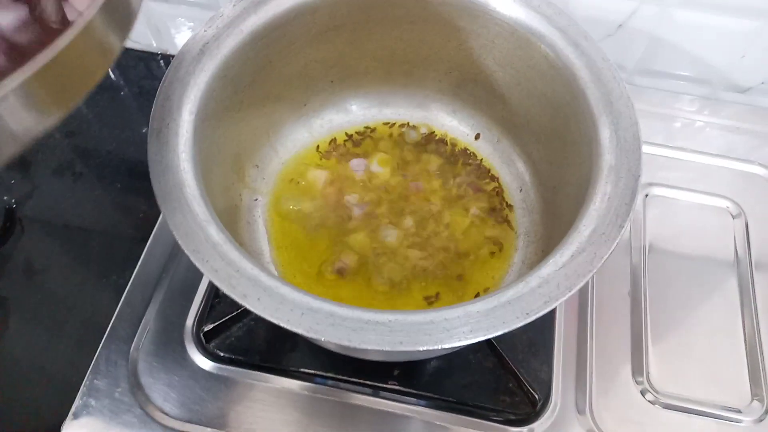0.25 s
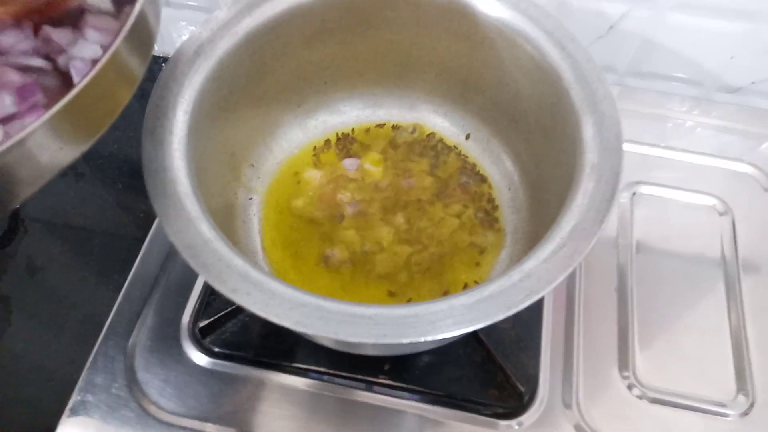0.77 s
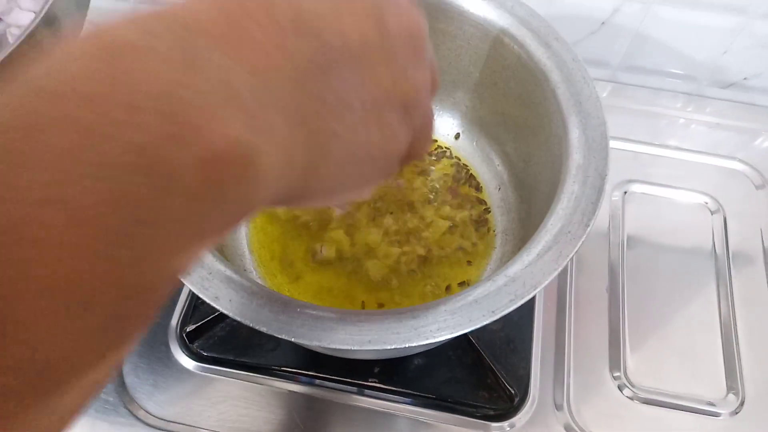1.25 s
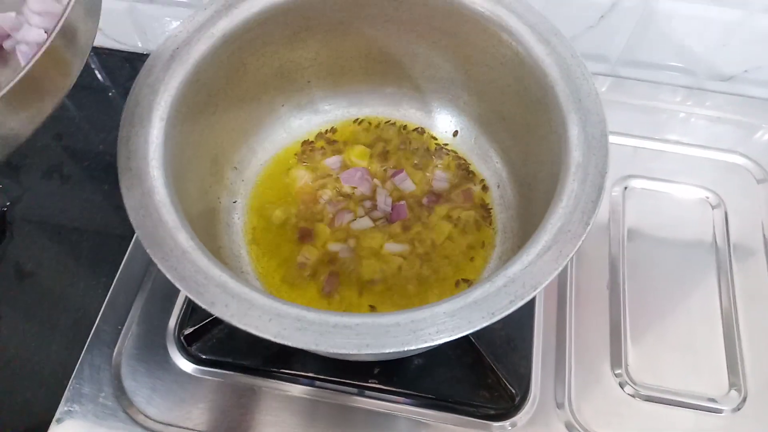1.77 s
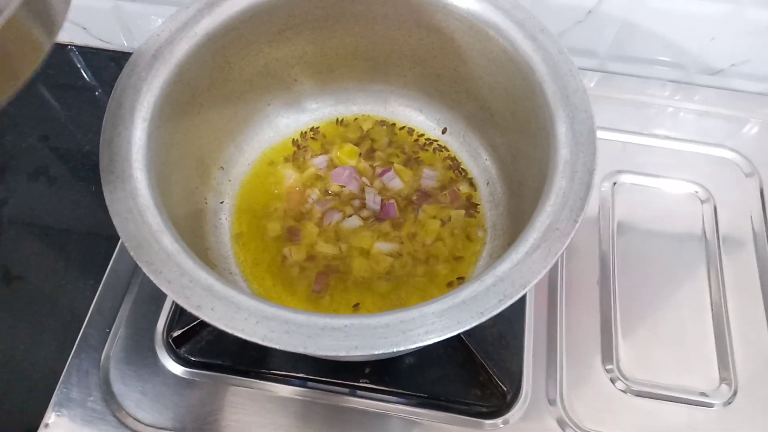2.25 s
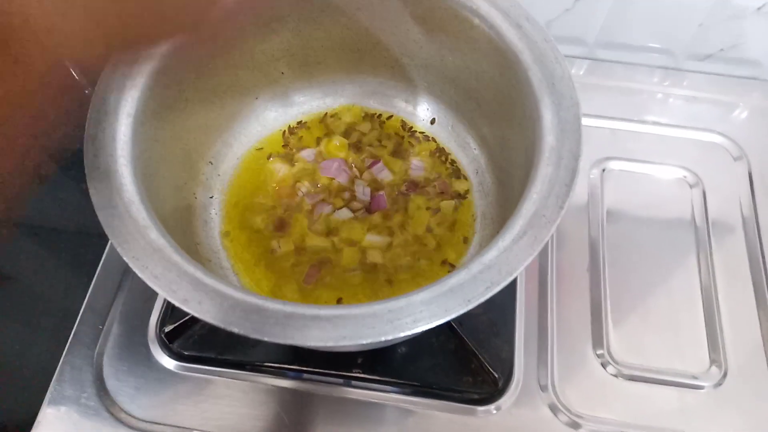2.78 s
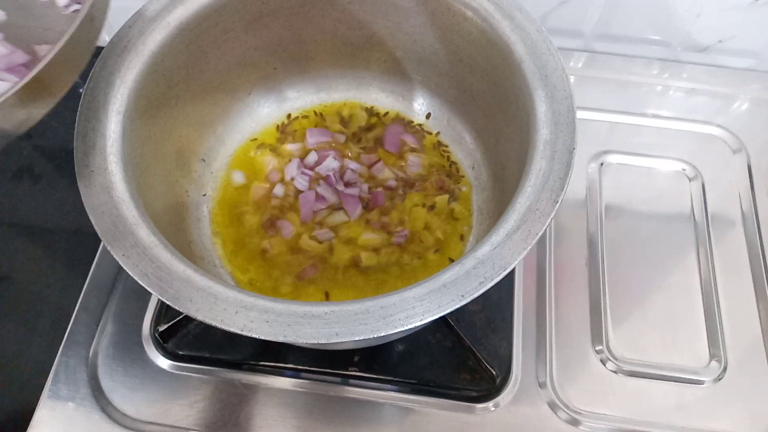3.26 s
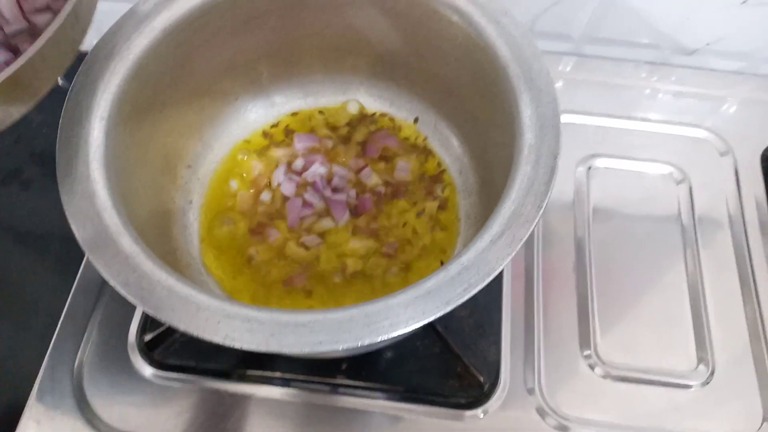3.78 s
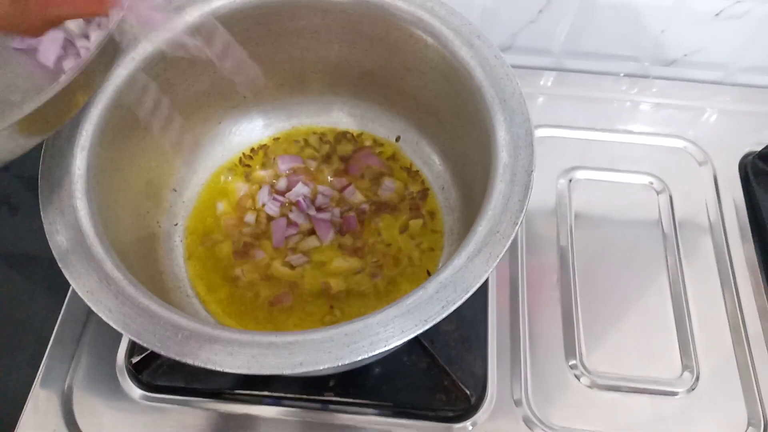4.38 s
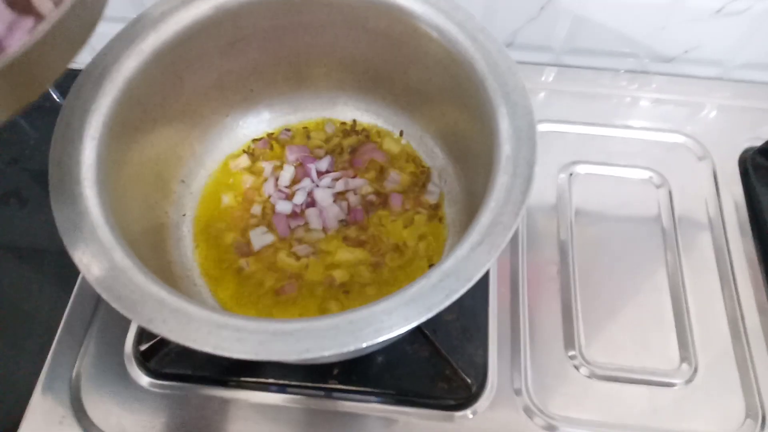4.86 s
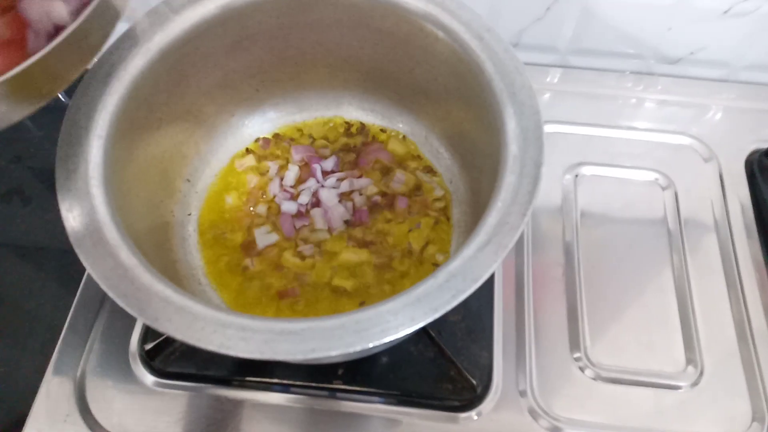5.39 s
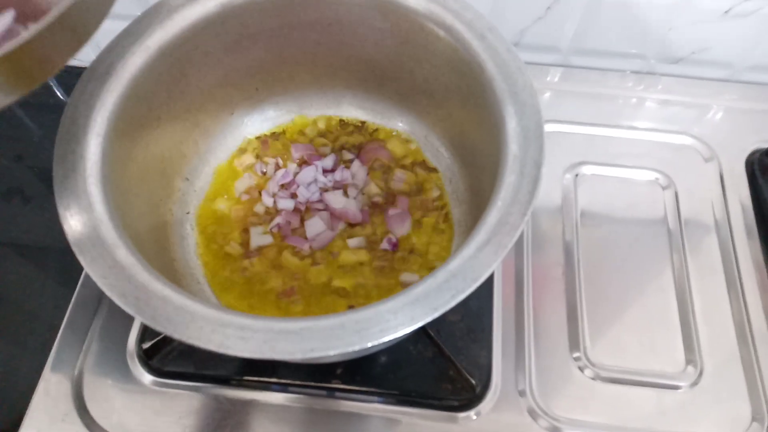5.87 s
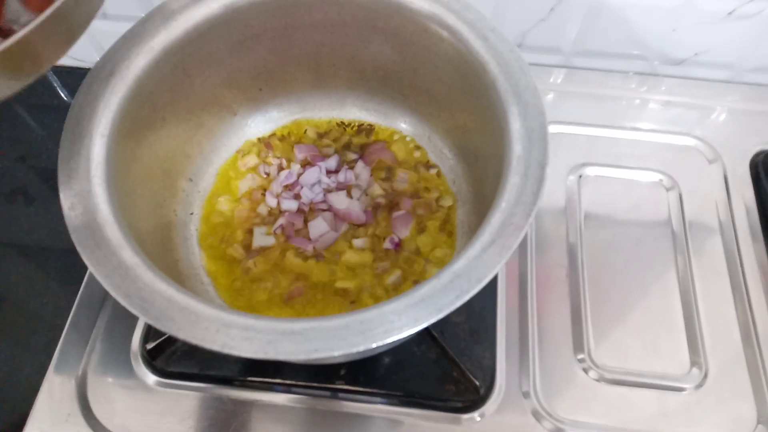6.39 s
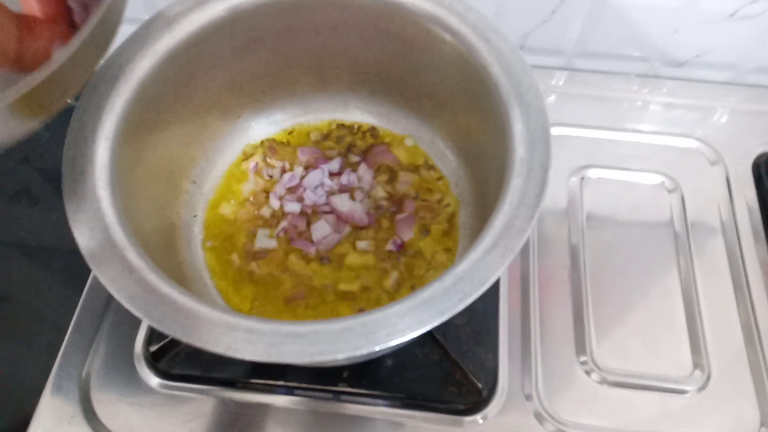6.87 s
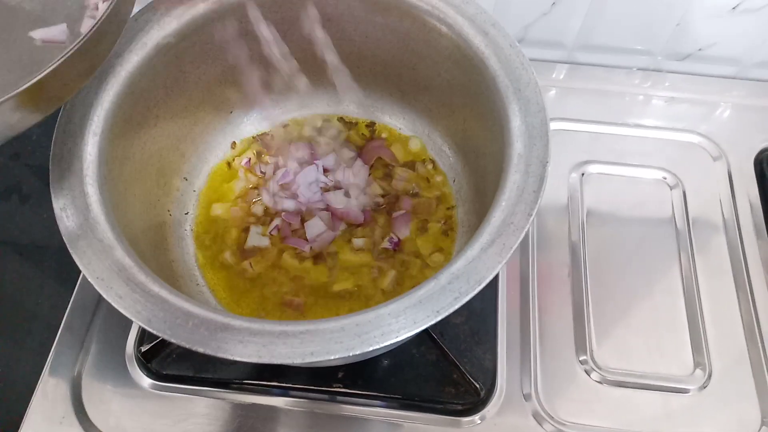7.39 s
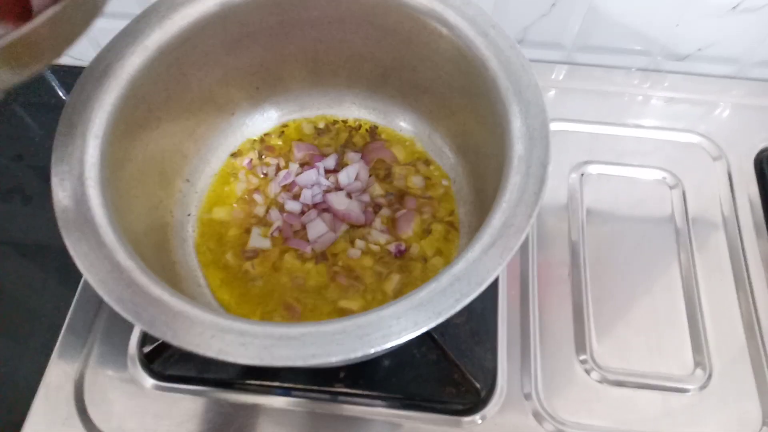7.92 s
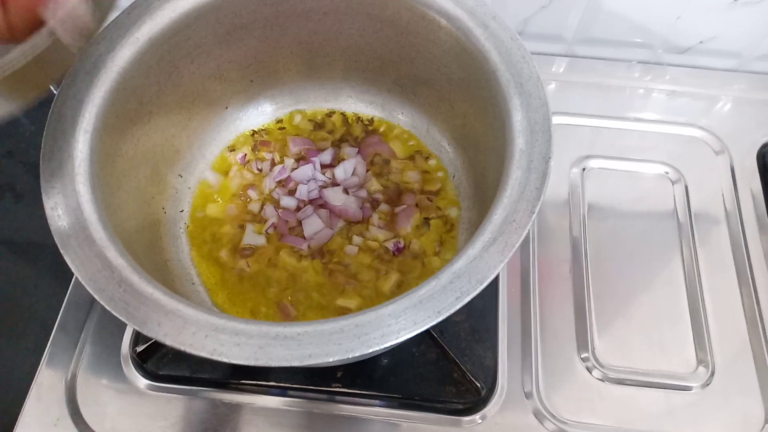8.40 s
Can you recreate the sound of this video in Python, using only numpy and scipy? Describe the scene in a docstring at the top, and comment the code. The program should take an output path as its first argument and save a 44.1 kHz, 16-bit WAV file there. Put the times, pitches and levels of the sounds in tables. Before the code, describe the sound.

A hand-held microphone close over a pot catches vigorous frying: gurgling bubbles, mid-bright crackle and fine fizz, coloured by hollow metal resonance. It is loudest at the start, with rapid hard pops, and soon becomes thinner and steadier. Short bubbling surges and hissing flares follow as onion lands, with occasional plops and tiny spits. A quiet low rumble and hum lie beneath, with a short kitchen echo.

```python
"""Onion frying in a deep pot

Chopped onion fries in hot oil in a deep aluminium pot on a gas stove, close to a hand-held microphone.
Water boils out as thousands of tiny ringing steam bubbles that burst, fiercely at first, then steadily.
Single bubbles pop loudly, oil spits, big bubbles and onion pieces plop, and a low rumble and hum lie below.
Resonances colour the bubbles, pops and plops like the pot; echoes add its walls and the kitchen."""
import sys
import numpy as np
from scipy import signal
from scipy.fft import rfft, irfft
from scipy.io import wavfile
from scipy.ndimage import uniform_filter1d

SR = 44100
rng = np.random.default_rng(int(sys.argv[2]) if len(sys.argv) > 2 else 0)


def file_out(sig):
    """Save sig as 16-bit WAV at sys.argv[1]."""
    # one column per channel
    cols = np.atleast_2d(sig).T
    # limit, then scale
    lim = np.clip(cols, -1, 1)
    pcm = np.round(lim * 32767).astype(np.int16)
    wavfile.write(sys.argv[1], SR, pcm)


N = 381465
TIME = np.arange(N) / SR  # seconds

# Event levels below are peaks before the gain of their layer and of the kitchen.
# standout steam pops: t/s, level/dB, f/Hz, ring/cycles (shortened in pops)
STEAM_POPS = [(0.0412, -6.5, 3300, 5.5), (0.1455, -6.5, 3800, 2.9), (0.2039, -5.5, 3410, 2),
              (0.2481, -5.5, 2300, 1.2), (0.341, -9, 3730, 2.1), (0.399, -6.5, 3930, 4.3),
              (0.509, -7, 2650, 1.5), (0.6384, -4, 3630, 4.3), (0.6867, -5.5, 3000, 1.5),
              (0.7118, -5, 2940, 1.8), (0.8948, -4, 3200, 2.3), (0.9186, -10.5, 3150, 3.8),
              (1.0787, -9.5, 3560, 3.9), (1.1731, -3.5, 3330, 1.9), (1.2856, -5, 3650, 1.9),
              (1.5993, -6.5, 3480, 3.7), (1.6639, -7, 3700, 5.4), (2.2926, -7.5, 3800, 2.2),
              (2.378, -8.5, 3410, 9.8), (2.678, -11, 3870, 4.6), (3.3365, -11.5, 4030, 3.1),
              (3.9552, -7, 3460, 1.7), (4.0022, -3.5, 3540, 0.98), (4.1889, -4, 3270, 2.3),
              (4.509, -9, 2500, 3.7), (4.5456, -11, 3500, 5.3), (4.966, -11, 3180, 4.5),
              (5.5471, -5.5, 3300, 4.6), (5.782, -11.5, 3720, 5.7), (5.8846, -9.5, 3700, 4.5),
              (5.8923, -11.5, 3580, 5), (5.9342, -17, 2400, 4.4), (6.0598, -9.5, 3700, 3.5),
              (6.1287, -12, 2360, 7.3), (6.209, -2.5, 4230, 5.7), (6.3002, -5.5, 3430, 1.8),
              (6.5716, -7.5, 3700, 1.4), (7.4578, -11.5, 3800, 4.1), (7.61, -3.5, 3930, 2.1),
              (7.6443, -7, 3740, 8.8), (7.95, -10, 2940, 11), (8.2591, -12.5, 3300, 4.4),
              (8.3504, -8.5, 3440, 4.6), (8.5857, -8.5, 2780, 1.5)]
# the sharpest spits of oil: t/s, level/dB, f/Hz
OIL_SPITS = [(0.056, -22, 6470), (0.572, -25, 6560), (0.7527, -24.5, 7500), (1.2868, -21.5, 6760),
             (3.878, -22.5, 5900), (4.396, -30, 8240), (4.9419, -38, 12700), (6.208, -29, 7960),
             (6.301, -30, 6640), (6.3483, -26, 6160), (6.5705, -38, 7500), (6.6515, -28, 6140),
             (6.7992, -23.5, 6760), (7.6106, -26.5, 5870), (8.403, -32, 7630), (8.421, -27, 4980),
             (8.4529, -36, 9800)]
# dull plops of big bubbles and of onion pieces landing: t/s, level/dB, f/Hz, ring/cycles
DULL_PLOPS = [(0.8932, -9.5, 1010, 0.48), (0.918, -18.5, 700, 0.5), (1.0933, -12, 1420, 1.05),
              (1.4669, -9, 1650, 0.55), (2.6511, -20, 710, .4), (3.4975, -12.5, 794, 0.25),
              (3.555, -22, 950, 0.97), (3.6743, -25.5, 980, 1.6), (4.0011, -18, 810, 0.36),
              (4.6023, -6, 1060, 0.28), (6.0282, -15.5, 700, 0.28), (6.904, -12, 1140, 0.45),
              (7.8555, -16.5, 1110, 0.63), (7.9181, -11.5, 1300, 0.48), (8.2353, -7.5, 1600, 0.76),
              (8.2395, -14.5, 800, 0.26)]
# soft low bumps: t/s, level/dB, f/Hz, ring/cycles
SOFT_BUMPS = [(1.286, -38, 186, 1.1), (3.24, -46.5, 238, 20), (3.455, -30, 320, 2.5),
              (5.198, -44, 110, 5.8), (6.208, -46, 170, 0.44), (6.301, -35, 170, 0.29),
              (6.611, -38.5, 75, 1.4), (6.798, -43, 180, 0.8)]

# resonances of the pot and the air in it: f/Hz, width/Hz, boost/dB
POT_MODES = [(367.5, 9.3, 13), (630, 19, 1), (674, 8.9, 5), (732.4, 14, 6.8), (904, 28, 4), (1001, 6.9, 6),
             (1128, 16, 5.5), (1434, 6.7, 4.5), (1516, 26, 3.5), (1607, 44, 10), (1720, 61, 3.5),
             (2463, 86, 8), (3160, 160, 3)]
# broad colour of the frying as it leaves the pot: f/Hz, level/dB
FRYING_COLOUR = [(150, -29.5), (350, -15.5), (500, -18.5), (720, -13), (1130, -15), (1450, -9.5),
                 (2100, -5.5), (3200, 0.5), (4150, 1.5), (4900, -5), (5550, -15), (6600, -16),
                 (10500, -37.5), (15500, -38)]
# broad shape of the flame's rumble, relative only: f/Hz, level/dB per Hz
FLAME_SHAPE = [(20, -27), (42, -21), (58, -4), (80, -4.5), (130, -3.5), (200, -6), (400, -7.5),
               (900, -13.5), (4000, -39)]
# rumble around the stove, before the gain in stove: t/s, level/dB
RUMBLE_LEVEL = [(0, -58.5), (1.25, -60), (1.6, -61), (2.7, -61), (3.4, -58), (4.2, -59.5), (4.9, -58),
                (5.9, -58), (7.55, -58), (8.1, -60.5), (8.65, -57.5)]
# low hum and resonances around the stove: f/Hz, width/Hz, boost/dB
HUM_AND_RESONANCES = [(60.2, 3.9, 9), (84, 3.4, 3.5), (110, 6.9, 9), (183.8, 3.8, 11), (216, 5.2, 6.5)]

# One row for each bubble size, before the trims in sizzle:
# settled level/dB, extra at the start/dB, share of a surge, share of a handful's flare
LARGE_BUBBLES = (-37, 9.0, 1.0, 0.03)
MIDDLE_BUBBLES = (-31, 11, 0.35, 0.1)
FINE_BUBBLES = (-48.5, 10.5, 0.25, 0.5)
SPRAY_DROPLETS = (-64.5, 8, -0.06, 0.68)
# handfuls of wet onion land and the fine spray flares up: t/s, full flare/dB
ONION_HANDFULS = [(1.36, 4), (2.96, 5.5), (4.5, 6), (5.6, 1.9), (8.22, 4)]
# surges of coarse bubbling: t at the top/s, time from the top to 37 % of the dB/s, full surge/dB
BUBBLING_SURGES = [(0.22, 0.038, 4), (1.48, 0.087, 2), (2.08, 0.074, 2.0), (3.959, 0.13, 3.5),
                   (4.53, 0.1, 4), (4.97, 0.07, 2.5), (6.18, 0.24, 3), (6.98, 0.11, 3.5), (7.88, 0.26, 3.4),
                   (8.27, 0.09, 3.5), (8.62, 0.072, 3.5)]
# lesser pops at random: rate/per s, level over the crackle/dB, spread/dB, f/Hz, spread/octaves
RANDOM_POPS = (7.0, 14.1, 0.99, 3420, 0.19)
# lesser spits at random: rate/per s, level over the fizz/dB, spread/dB, f/Hz, spread/octaves
RANDOM_SPITS = (4.0, 12, 2.2, 6760, 0.224)

SETTLE_S = 1.15  # time constant of the first fierce boil dying down
FLARE_RISE_S, FLARE_HOLD_S, FLARE_FADE_S = 0.1, 0.35, 0.3
SPRAY_DRIFT_DB = 0.8  # the spray comes in uneven puffs
RANDOM_POP_CYCLES = 3.5  # ring, shortened in pops
EDGE_HZ = 15750  # upper band limit


def sizzle(pot):
    """Large bubbles gurgle, middling ones crackle, the finest fizz, droplets prickle, in shared flurries."""
    large_db = boiling(*LARGE_BUBBLES) + 0.47
    middle_db = boiling(*MIDDLE_BUBBLES) - 0.3
    fine_db = boiling(*FINE_BUBBLES) - 0.8
    spray_db = boiling(*SPRAY_DROPLETS) + 2
    flurry = wobble(size=500)
    spray_db = spray_db + SPRAY_DRIFT_DB * wobble(size=5000)
    fizz_colour = high_pass(pot, hz=5360, order=6)
    prickle_colour = high_pass(pot, hz=9500, order=4)
    gurgle = swarm(pot, large_db, 1.3 * flurry, low_hz=595, high_hz=1876,
                   per_s=1500, spread_db=3.0, cycles=1.03)
    crackle = swarm(pot, middle_db, 0.84 * flurry, low_hz=2460, high_hz=4460,
                    per_s=1700, spread_db=3.5, cycles=1.25, count=80)
    fizz = swarm(fizz_colour, fine_db, 1.2 * flurry, low_hz=5720, high_hz=10300,
                 per_s=2400, spread_db=4.5, cycles=2.3)
    prickle = swarm(prickle_colour, spray_db, 0.5 * flurry, low_hz=10500, high_hz=16500,
                    per_s=1000, spread_db=4.5, cycles=2.5, count=24)
    return gurgle + crackle + fizz + prickle


def swarm(colour, level_db, flurry_db, low_hz, high_hz, per_s, spread_db, cycles, count=48):
    """Bubbles of many sizes burst at random, most of them weak."""
    # harder boiling means more bubbles
    chance = per_s / SR * amp(level_db - np.median(level_db))
    luck = np.minimum(rng.exponential(1, N), np.log(120))
    strength = amp(spread_db * luck + flurry_db)
    bursts = strength * rng.choice([-1, 1], N) * (rng.random(N) < chance)
    kind = rng.integers(0, count, N)
    out = np.zeros(N)
    for k, hz in enumerate(np.geomspace(low_hz, high_hz, count)):
        grain = walls(bubble(hz, cycles * rng.uniform(0.27, 1.21), rise_cycles=0.39))
        grain = grain / np.linalg.norm(grain) * np.sqrt(hz)
        out += signal.oaconvolve(bursts * (kind == k), grain)[:N]
    out = signal.oaconvolve(out, colour)[:N]
    # even out the slow level, then follow the wanted one
    power = uniform_filter1d(out ** 2, size=13000)
    return amp(level_db) * out / np.sqrt(abs(power) + 1e-20)


def boiling(settled_db, start_db, surge_share, flare_share):
    """Level of one bubble size: it settles, and takes its share of each surge and handful's flare."""
    surge_db = sum(db * np.exp(-((TIME - s) / width) ** 2) for s, width, db in BUBBLING_SURGES)
    flare_db = np.zeros(N)
    for s, db in ONION_HANDFULS:
        rise = np.clip((TIME - s) / FLARE_RISE_S, 0, 1)
        fading_s = np.maximum(TIME - s - FLARE_RISE_S - FLARE_HOLD_S, 0)
        flare_db += db * rise * np.exp(-fading_s / FLARE_FADE_S)
    early_db = start_db * np.exp(-TIME / SETTLE_S)
    return settled_db + early_db + surge_share * surge_db + flare_share * flare_db


def bubble(hz, cycles, rise_cycles, size=1024):
    """A bursting bubble rings for a few cycles."""
    turns = np.arange(size) * hz / SR
    return np.sin(2 * np.pi * turns) * (1 - np.exp(-turns / rise_cycles)) * np.exp(-turns / cycles)


def pops(pot):
    """Big steam bubbles burst with a crack and ring briefly between the pot's walls."""
    out = np.zeros(N)
    lesser = [(*row, RANDOM_POP_CYCLES) for row in strays(boiling(*MIDDLE_BUBBLES), *RANDOM_POPS)]
    for s, db, hz, cycles in STEAM_POPS + lesser:
        burst = bubble(hz, cycles * 0.6, rise_cycles=0.28)
        burst[0] += 1.4 / max(cycles, 1)  # the shorter the ring, the harder the crack
        burst = echoes(burst, echo_db=-4.0, t60=0.07, delay=0.0006)
        add(out, s, amp(db) * peaked(signal.fftconvolve(burst, pot)))
    return amp(1.23) * out


def spits():
    """Droplets of oil snap: a bright click and a very short ring."""
    out = np.zeros(N)
    for s, db, hz in OIL_SPITS + strays(boiling(*FINE_BUBBLES), *RANDOM_SPITS):
        tick = bubble(hz, cycles=1.44, rise_cycles=0.15)
        tick[0] += 0.45  # the click
        tick = high_pass(tick, hz=0.46 * hz, order=3)
        add(out, s, amp(db) * peaked(walls(tick)))
    return amp(8.5) * out


def strays(level_db, per_s, over_db, spread_db, hz, octaves, count=120):
    """Rows (t/s, level/dB, f/Hz) of chance bursts that stand out of a layer."""
    times = (np.arange(count) + rng.uniform(-1, 1, count)) / per_s
    loud, high = rng.standard_normal((count, 2)).T
    peaks_db = np.interp(times, TIME, level_db) + over_db + spread_db * np.clip(loud, -2, 2)
    pitches_hz = hz * 2 ** (octaves * high)
    return [row for row in zip(times, peaks_db, pitches_hz) if 0 < row[0] < TIME[-1]]


def plops(pot):
    """A blunt push in the oil, and the whole pot answers with its low resonances."""
    out = np.zeros(N)
    for s, db, hz, cycles in DULL_PLOPS:
        push = bubble(hz, cycles, rise_cycles=cycles / 3)
        push = echoes(push, echo_db=-6.0, t60=0.087, delay=0.00088)
        add(out, s, amp(db) * peaked(signal.fftconvolve(push, pot)))
    return out


def pot_response(size=8192):
    """The pot's answer to one click: its resonances on a broad colour, with no sound before the click."""
    hz = abs(np.fft.fftfreq(size, 1 / SR))
    log_gain = np.log(amp(read(FRYING_COLOUR, hz) + boosts(POT_MODES, hz)))
    # the Hilbert transform finds the phase that puts the answer after the click
    spectrum = np.exp(np.conj(signal.hilbert(log_gain)))
    return np.fft.ifft(spectrum).real[:size // 2]


def walls(x):
    """Every spot in the oil has its own reflections from the pot wall."""
    return echoes(x, echo_db=-4.5, t60=0.025, delay=0.0013)


def kitchen(x, count=5):
    """The room's short tail, changing as the microphone sways over the pot."""
    # fade in turn between several tails, 4.3 of them a second
    turn = TIME * 4.3
    out = np.zeros(N)
    for k in range(count):
        distance = abs((turn - k + count / 2) % count - count / 2)
        share = np.maximum(1 - distance, 0)
        out += echoes(x * share, echo_db=-7.0, t60=0.88, delay=0.0055)[:N]
    return out


def stove():
    """Shaped noise makes the flame's uneven rumble and the low hum around it; a few soft bumps ring low."""
    hz = np.fft.rfftfreq(N, 1 / SR)
    gain = amp(read(FLAME_SHAPE, hz) + boosts(HUM_AND_RESONANCES, hz))
    rush = evened(irfft(rfft(rng.standard_normal(N)) * gain, N))
    level_db = np.interp(TIME, *np.transpose(RUMBLE_LEVEL)) + 4.5
    out = rush * amp(level_db + 2.15 * wobble(size=2500))
    for s, db, pitch_hz, cycles in SOFT_BUMPS:
        add(out, s, amp(db) * peaked(bubble(pitch_hz, cycles, rise_cycles=0.1, size=8000)))
    return high_pass(out, hz=42.2, order=3)


def echoes(x, echo_db, t60, delay):
    """The direct sound, then dense reflections that die away by 60 dB in t60 seconds."""
    t = np.arange(int(t60 * SR)) / SR
    tail = rng.standard_normal(len(t)) * np.exp(-np.log(1000) * t / t60) * (t > delay)
    response = amp(echo_db) * tail / np.linalg.norm(tail)
    response[0] = 1
    return signal.fftconvolve(x, response)


def boosts(modes, hz):
    """The dB that a set of resonances adds at each frequency."""
    total_db = 0
    for f, width, db in modes:
        offset = 2 * (hz - f) / width
        total_db = total_db + 10 * np.log10(1 + (amp(db) ** 2 - 1) / (1 + offset ** 2))
    return total_db


def read(points, hz):
    """Reads a spectrum on a log-frequency axis."""
    f, db = np.transpose(points)
    return np.interp(np.log(hz + 1), np.log(f + 1), db)


def high_pass(x, hz, order):
    """Weakens what lies below hz."""
    return signal.sosfilt(signal.butter(order, hz, "high", fs=SR, output="sos"), x)


def wobble(size):
    """Smooth chance of rms 1 that changes over about size samples."""
    smooth = uniform_filter1d(rng.standard_normal(N), size)
    return evened(uniform_filter1d(smooth, size // 2))


def amp(db):
    """Turns dB into a plain factor."""
    return 10 ** (np.asarray(db) / 20)


def evened(x):
    """Scales to rms 1."""
    return x / np.sqrt(np.mean(x ** 2) + 1e-20)


def peaked(x):
    """Scales to peak 1."""
    return x / (abs(x).max() + 1e-20)


def add(mix, s, sound):
    """Mixes a sound in at s seconds."""
    part = mix[round(s * SR):][:len(sound)]
    part += sound[:len(part)]


def scene():
    """The pot on the stove in a small tiled kitchen."""
    pot = pot_response()
    frying = sizzle(pot) + pops(pot) + spits() + plops(pot)
    return (amp(-0.64) * kitchen(frying) + stove())[None]


def record(dry):
    """The input stage rounds off the loudest peaks; then the highest treble is cut."""
    over = np.maximum(abs(dry) - 0.55, 0)
    rounded = dry - np.sign(dry) * (over - np.tanh(4 * over) / 4)
    band_limit = signal.firwin(511, EDGE_HZ, window=("kaiser", 9), fs=SR)
    return signal.oaconvolve(rounded, band_limit[None], "same")


dry = scene()
out = record(dry)
file_out(out)
```